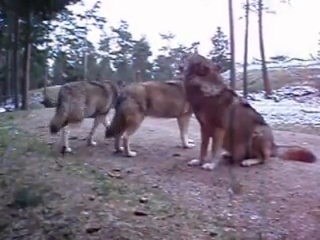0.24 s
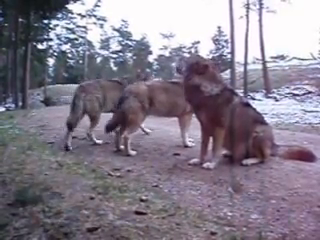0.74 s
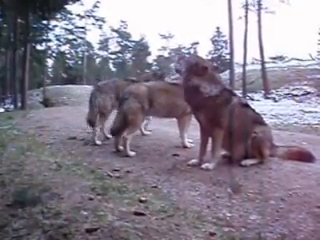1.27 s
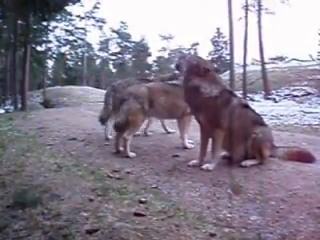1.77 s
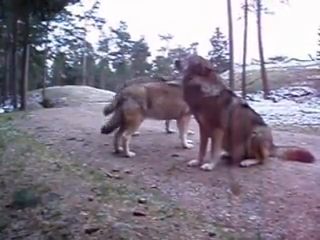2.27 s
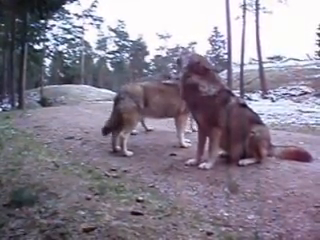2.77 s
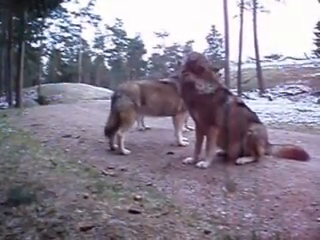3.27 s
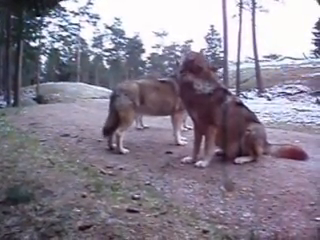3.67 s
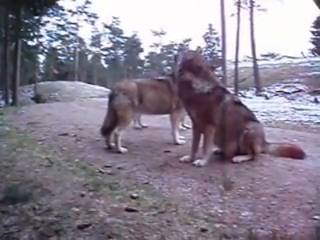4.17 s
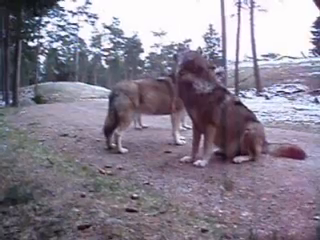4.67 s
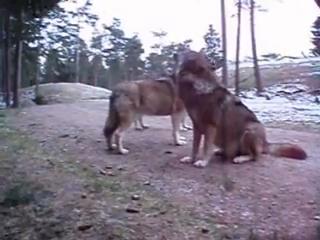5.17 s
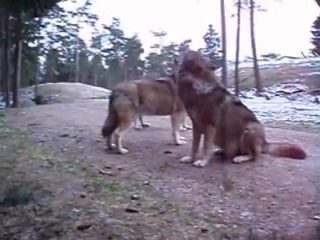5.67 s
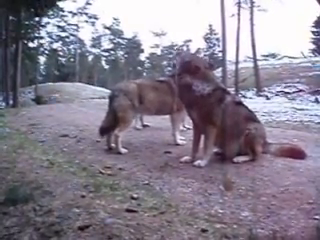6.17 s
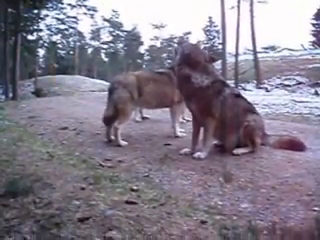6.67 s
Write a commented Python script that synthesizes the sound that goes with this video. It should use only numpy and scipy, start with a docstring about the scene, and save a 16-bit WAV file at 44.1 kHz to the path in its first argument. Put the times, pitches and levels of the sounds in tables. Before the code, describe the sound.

Four wolves howl together outdoors, near-pure voices gliding, yodelling and crossing in pitch, with light woodland echo, faint wind rumble and lo-fi camera sound.

```python
"""In a wooded enclosure, four wolves howl together: near-pure voices glide, yodel and cross.
Each voice is a stack of harmonics shaped by mouth and throat, with breath noise and rasping breaks.
Trees echo the voices through decaying noise, over wind rumble and camera hum.
A few faint clicks, short broadband pulses, are added to the sound.
The camera samples at 8 kHz and a spline joins the samples, which mirrors the voices faintly in the treble."""
import sys
import numpy as np
from scipy import signal
from scipy.fft import rfft, irfft
from scipy.io import wavfile
from scipy.ndimage import uniform_filter1d, minimum_filter1d

SR = 44100
rng = np.random.default_rng(int(sys.argv[2]) if len(sys.argv) > 2 else 0)


def generate_wav(signal):
    """Clip the signal to [-1, 1] and save it as 16-bit WAV at the path in sys.argv[1]."""
    frames = np.transpose(np.atleast_2d(signal))
    scaled = np.clip(frames, -1, 1) * 32767
    pcm = np.round(scaled).astype(np.int16)
    wavfile.write(sys.argv[1], SR, pcm)


N = 305613

# Colour of the wind rumble: [f/Hz, relative level/dB per Hz]
RUMBLE_COLOUR = [(20, -11), (40, -11.5), (70, -3.5), (100, -5.5), (150, -6), (220, -3.5), (400, -12),
                 (1000, -23.5), (4000, -48.5)]
# Tones of the camera hum: [f/Hz, peak level/dB against the rumble's rms]
HUM_TONES = [(30, -3), (60, -6), (88, -1.5), (120, -10)]
# Spells in which rumble and hum swell or sink: [start t/s, end t/s, level/dB against the calm]
GUSTS = [(0, .5, 5.5), (0.754, 1.49, 3.5), (1.903, 2.49, 5.5), (3.069, 3.48, 7), (3.5, 4.5, 2.5),
         (4.495, 4.95, -3.5), (5.048, 5.5, 0), (5.902, 6.93, 6.5)]
# Faint clicks, short broadband pulses: [t/s, peak level/dB before limiting and sampling]
CLICKS = [(3.977, -17), (3.993, -17), (4.486, -12), (4.492, -9)]
# Colour the throat gives the upper harmonics: [f/Hz, level/dB]
THROAT_COLOUR = [(800, -6.5), (1300, 8), (1700, 3), (2100, -5), (2400, -12), (2700, -21), (3100, -23),
                 (4000, -25)]
# Colour of the breath noise in the voices: [f/Hz, relative level/dB per Hz]
BREATH_COLOUR = [(250, -26), (500, -13), (1000, -13), (1600, -7), (2200, -10), (2800, -13), (4000, -9)]
# Voice breaks, where the folds vibrate chaotically:
# [middle t/s, half length/s, level/dB, tone f/Hz that sets the noise band]
VOICE_BREAKS = [(.48, 0.069, -31.5, 1200), (1.201, 0.061, -26, 1530), (1.288, 0.088, -20.5, 1440),
                (1.809, 0.089, -32.5, 1080), (1.963, 0.025, -26, 1410), (2.156, 0.044, -26, 1870),
                (2.317, 0.028, -24.5, 920), (2.479, 0.045, -29.5, 1230), (2.573, 0.022, -23.5, 1510),
                (3.966, 0.042, -32.5, 880), (6.481, 0.043, -33.5, 1190)]
# Second, slower vibration in the low wolf's throat: [t/s, beat f/Hz, depth 0-1]
GROWL_BEAT = [(2.05, 150, 0), (2.115, 147, .3), (2.165, 126, .95), (2.235, 113, 0)]
# Yodels, brief rounded leaps of pitch, listed by wolf: [top t/s, length/s, rise/semitones]
YODELS = { "low": [(.05, 0.094, 3.9), (.48, 0.18, 5.2), (.635, 0.2, 3.46), (.79, 0.055, 1.6),
          (2.02, 0.095, 1.28), (2.105, 0.085, 1.15), (2.3, 0.17, 1.2), (2.665, 0.14, 2.27),
          (2.795, 0.14, 1.44), (2.91, 0.17, 0.97), (3.36, 0.13, 1.03), (3.93, 0.071, 1.7),
          (4.205, 0.12, 3.3), (4.795, .12, 1.66), (5.048, 0.12, 2.68), (5.168, 0.14, 3.15),
          (5.28, 0.09, 2.4)], "middle": [(5.04, 0.099, 0.86), (5.41, 0.075, 1.21), (5.725, 0.062, 1.8)],
          "high": [(1.195, 0.072, 4), (1.465, .09, 1.355), (2.755, .11, 1.8), (6.125, 0.0591, 1.113)],
          "yelping": [(1.165, 0.065, 1.7)], }
# Path of each howl, listed by wolf:
# [t/s, pitch f/Hz, level/dB, mouth resonance/octaves above MOUTH_HZ]
HOWL_PATHS = { "low": [ [(0, 405, -20, 1.72), (.14, 412, -24, 0.57), (.24, 369.8, -29, 0.31),
              (.41, 340.2, -29, 0.82), (.49, 346.8, -15, 1.94), (.58, 352.8, -26, 1.66),
              (.74, 352.4, -23.5, 0.46), (.92, 352.6, -24, 0.47), (.94, 421, -23, 1.23),
              (1.04, 396.3, -19, 0.71), (1.21, 412.5, -22.5, 0), (1.245, 511, -23, 0.097),
              (1.257, 608, -10, .3), (1.288, 631, -8.5, .3), (1.296, 451, -24, 0), (1.38, 313, -31, 0)],
              [(1.75, 366.6, -25, 0.32), (1.8, 287.2, -30.5, 0.14), (1.84, 403.4, -22, 0.94),
              (1.885, 629, -24, 1.7), (1.92, 712.6, -27.5, 1.55), (1.95, 657, -18.5, 1.36),
              (1.965, 496, -21.5, 1.5), (2.1, 474, -13, 1.65), (2.16, 466, -21.5, 1.44),
              (2.26, 462.6, -21, 1.4), (2.37, 465.4, -23.5, 1.15), (2.43, 527.6, -27, 1.5),
              (2.45, 518, -22.5, 1.34), (2.47, 486, -18, 1.3)], [(2.455, 457.5, -21, 0.92),
              (2.49, 434.4, -24.5, 1.3), (2.53, 613.6, -22.5, 1.52), (2.555, 624.6, -17, 1.8),
              (2.565, 482.5, -23.5, 1.37), (2.6, 426.4, -21, 1.37), (2.74, 402, -19, 1.02),
              (3.215, 431.3, -16.5, 2), (3.272, 500, -11, 2.13), (3.297, 426.4, -20, 1.63),
              (3.44, 420.6, -26, 1.26), (3.61, 375, -26.5, 1), (3.71, 338.8, -33.5, 0.75),
              (4.14, 347.5, -35.5, 1.56), (4.275, 384, -28.5, 1.4), (4.34, 503.5, -30.5, 1.44),
              (4.4, 480.6, -25.5, 1.57), (4.43, 613.5, -24, 1.1), (4.47, 633, -22, 0.42)],
              [(4.49, 539.7, -13, 1.5), (4.52, 442.7, -19.5, 1.32), (4.57, 507.6, -18.5, 1.24),
              (4.66, 425.7, -25, 1.54), (4.94, 410, -24, 1.05), (5.0, 372, -25, 0.86),
              (5.1, 360.1, -24.5, 0.82), (5.24, 358.3, -20.5, 0.8), (5.39, 362.8, -22, 0.67),
              (5.56, 334.4, -22, 0.55), (5.585, 352, -24, 0.69), (5.6, 397, -22.5, 0.66),
              (5.66, 389.2, -24.5, 0.74), (5.695, 318.3, -24.5, 0.3)], [(5.68, 325, -26, 0.3),
              (5.84, 334.4, -29, 0.55), (6.15, 321.6, -34.5, 0.52), (6.23, 308, -29, 0.17)],
              [(6.215, 308.6, -26, 0.17), (6.26, 600, -19, 0.88), (6.285, 590, -30, 1.8),
              (6.31, 419.4, -23, 1), (6.35, 337.5, -26, 0.71), (6.445, 383, -14, 0.63)],
              [(6.425, 413.8, -28.5, 0.84), (6.54, 512, -14.5, 0.85), (6.61, 519.7, -10, 0.68),
              (6.62, 606.4, -9, 0.18), (6.69, 556.4, -7, 0.42), (6.7, 494, -12, 0.92),
              (6.76, 473.6, -15.5, 0.73), (6.85, 453.7, -19.5, 1.02), (6.93, 388.5, -16, 0.64)]],
              "middle": [ [(0, 554, 0, 0.49), (.1, 575, -16.5, 0.72), (.13, 529, -22.5, 1.36),
              (.23, 513, -22, 1.23), (.3, 644, -19, 1.22), (.37, 639.4, -10.5, 0.93),
              (.44, 547, -23.5, 1.1), (.51, 518, -18.5, 1.4), (.6, 434, -22.5, 0.8), (.75, 396, -17, 0.43),
              (.91, 444, -12.5, 0.82), (.94, 526, -22, 0.31), (1.01, 529, -14.5, 0.53),
              (1.02, 465, -17, 1.11), (1.15, 489, -19, 1.26), (1.2, 623, -15.5, 1.51),
              (1.33, 578, -18.5, 0.89), (1.37, 523, -22, 0.67), (1.56, 465, -17, 0.78),
              (1.74, 426, -22, 0.98), (1.9, 401, -15.5, 0.53)], [(1.89, 460, -16, -0.52),
              (2.03, 470, -10.5, -0.65), (2.17, 461, -23.5, -0.095), (2.33, 468, -11, -0.53),
              (2.4, 458, -13.5, -0.12), (2.47, 462, -16, 0.061), (2.59, 618, -30, 0.26),
              (2.74, 576, -23.5, 0.44), (2.85, 600, -21.5, 0.85), (3.06, 586, -22, 0.45),
              (3.16, 556, -18, 0.39), (3.29, 569, -45, 0.21)], [(3.3, 484, -15, 0.27),
              (3.36, 482, -25.5, 0.67), (3.51, 591, -22, 0.66), (3.63, 570, -11.5, 0.35),
              (3.73, 622, -12, 0.68), (3.75, 560, -17, 0.94), (3.93, 597, -13.5, 1.03),
              (3.97, 660, -11.5, 0.45), (4.11, 640, -10, 0.26), (4.16, 685, -11, 0.31),
              (4.28, 697, -5.5, 0.57), (4.35, 686, -14.5, 0.66), (4.4, 621, -15.5, 0.9),
              (4.45, 644, -16, 1.06), (4.55, 568, -10, 1.1), (4.74, 506, -18.5, 1.16),
              (4.82, 497, -17.5, 1.05), (4.88, 545, -19.5, 1.27), (4.95, 725, -11.5, 0.73),
              (5.09, 666, -12.5, 0.21), (5.16, 662, -11.5, 0.69), (5.25, 724, -13, 0.54),
              (5.36, 699, -11, 0.89), (5.54, 707, -15, 0.11), (5.68, 790, -15.5, 0.92), (5.75, 839, -24, 1),
              (5.81, 901, -20, 0.71), (5.89, 640, -21.5, 0.42), (5.96, 555, -38, 0.2)]],
              "high": [ [(0, 783.5, 10.5, 0.92), (.05, 829, -14.5, 1), (.15, 735, -12.5, 0.37),
              (.26, 744, -12, 1), (.45, 632.5, -10.5, 0.17)], [(.49, 617, -20.5, 1.17),
              (.64, 614, -20.5, 0.085), (.71, 680, -24, 1), (.8, 552, -20.5, 0.9)], [(1.16, 497.7, -28, 0),
              (1.25, 500, -15, 1.42), (1.31, 461, -19.5, 0.84), (1.36, 530.5, -20, 1.29),
              (1.52, 477, -21, 1.17), (1.65, 417.9, -20, 0.55), (1.71, 434.7, -28.5, 1.2),
              (1.82, 411.4, -18, 0)], [(2.48, 530, -29, .5), (2.6, 598.4, -18, 0.64),
              (2.71, 644.4, -17, 0.66), (2.82, 639, -14, 1.06), (2.86, 752, -19.5, 0.55),
              (2.91, 765, -10.5, 1), (2.96, 951, -16.5, 0.85), (3.11, 1017, -15, 0.86),
              (3.14, 1090, -29, 1.22), (3.24, 1240, -37, 1.37)], [(3.46, 1099, -15.5, 1.02),
              (3.56, 1005, -16, 0.89), (3.69, 793, -15, 0.65), (3.86, 698, -17, 0.44),
              (3.95, 640, -13.5, 0.15), (4.04, 535, -20, 0.12), (4.15, 504, -22, 0.14),
              (4.17, 620, -16, -0.37), (4.25, 511, -11.5, -0.14), (4.36, 495, -25, 0.076),
              (4.54, 479.3, -21, -0.13), (4.76, 490.4, -13.5, -0.49), (4.84, 437, -30, 0.1),
              (4.96, 429, -25.5, 0.18), (5.09, 441, -11.5, -0.76), (5.26, 494, -14.5, -0.23),
              (5.34, 718, -38, 1.5), (5.43, 731, -17, 1.15), (5.5, 607, -14, 0.57),
              (5.59, 525.7, -25, 1.08), (5.84, 464.5, -27, 1.05), (5.96, 512, -23, 1.05),
              (6.045, 601.5, -19.5, 1.13), (6.15, 631, -16, 0.86), (6.23, 603.3, -17.5, 1.16),
              (6.29, 643, -20, 1.6), (6.32, 561, -17.5, 1.1), (6.38, 510.4, -20.5, 1.04),
              (6.44, 494, -22.5, 0.66)]], "yelping": [ [(1, 684.5, -35, 0.44), (1.08, 754, -27, 0.49),
              (1.14, 663, -31.5, 1.1), (1.2, 644, -8, 1.1)], [(2.21, 586, -36, 0.19),
              (2.25, 684, -25, 0.28), (2.33, 621, -15.5, 0.19)], [(6.24, 604, -42.5, 0.17),
              (6.27, 618, -10, 0.31), (6.34, 625, -24.5, 0.33), (6.42, 711, -33.5, 0.44)],
              [(6.75, 630, -17, 0.32), (6.78, 695, -21, 0.38), (6.85, 678, -13, 0.31),
              (6.93, 664, -25, 0.27)]], }
# Voice of each howl, listed by wolf: [level of the fundamental that passes whatever the mouth does/dB,
# 2nd harmonic/dB, 3rd harmonic/dB, loss for each harmonic beyond the 3rd/dB, their lift at RING_HZ/dB]
HOWL_VOICES = { "low": [(-6, 0.47, -1.2, -0.9, -8), (-7, 0.064, 2.3, 0, -1), (-5, 0.99, -1.15, -0.5, 1.5),
               (-17.5, 1, -2.3, 0, 5), (-13, 0.75, 0.32, -0.24, 9.5), (-18, 0.57, -2.7, 1, 4),
               (-16, 0, 0.88, 0, 0)], "middle": [(-15, -2.2, -3.5, -1.17, -3), (-10.5, 1, -5.5, -4, 1),
               (-15, -0.38, -1.3, 1, 0.5)], "high": [(-19, 1.8, -5, -4.5, -7), (-19, 2.5, -4, 6, -3),
               (-22, -4, -0.5, 2.5, 5.5), (-18, -1.5, -1.5, -5.5, 1.5), (-28.5, -1.8, -0.5, 2, -1.8)],
               "yelping": [(-15, -2.5, -6, 4, 6), (-8, 6.5, 0, -7.5, -1), (-17, -6, -7, 5.5, 5),
               (-13, -18.5, 1, 12, 7)], }

CALM_DB, GUST_EDGE_S, BUFFET_DB = -54.5, .04, 2  # calm rumble; length of a spell's edges; quick wavering
TREES_T60_S, TREES_DB = .5, -19  # time for the echoes to fall 60 dB; their level
MOUTH_HZ = 500
MOUTH_OCTAVES, MOUTH_FALL_DB = .36, 18  # half width of the mouth resonance; steepness of its skirts
RING_HZ, RING_OCTAVES = 2250, .13  # second throat resonance, strong in some howls
WAVER, DRIFT = .002, .004  # quick and slower unsteadiness, as shares of the pitch
BREAK_JITTER = .012  # share of the pitch at the height of a break
FLUTTER_DB, SHIMMER_DB = 1.4, 1.18  # wavering of the fundamental; unevenness of the whole voice
HOARSE_DB = .55  # fast shimmer of a harmonic at 1 kHz, growing with the square of its frequency
LEAP_PER_S = 5  # pitch shares a second at which a glide becomes a leap
LEAP_DULL_DB = .5  # loss a harmonic at twice that speed
EDGE_S = .015  # fade at both ends of a howl
BREATH_DB, BREATH_FOLLOWS = -17, .9  # gain; power by which breath follows the pressed voice
CEILING = .72  # peak limit ahead of the sampling
CAMERA_HZ = 8000  # sampling rate
LIFT_HZ, LIFT = 10900, 1.9  # treble above this is added again with this gain
OFFSET, TOP_HZ = -.0028, 15600  # constant shift; final treble cut


def undb(db):
    """Turn decibels into an amplitude factor."""
    return 10 ** (np.asarray(db) / 20)


def shape_db(table, hz):
    """Read a (Hz, dB) table on a log-frequency axis."""
    f, db = np.transpose(table)
    return np.interp(np.log(np.maximum(hz, 1)), np.log(f), db)


def coloured(table, count):
    """Noise of rms 1 with the given spectrum."""
    hz = np.arange(count // 2 + 1) * SR / count
    spectrum = rfft(rng.standard_normal(count)) * undb(shape_db(table, hz))
    noise = irfft(spectrum, count)
    return noise / noise.std()


def walk(rate, count):
    """Random levels held 1 / rate seconds and smoothed twice; spread near 1."""
    hold = int(SR / rate)
    steps = np.repeat(rng.standard_normal(count // hold + 1), hold)
    return 1.4 * uniform_filter1d(uniform_filter1d(steps, hold), hold)[:count]


def rumble():
    """Wind on the microphone is low noise; the camera's unsteady hum rides the same level."""
    t = np.arange(N) / SR
    hum = np.zeros(N)
    for hz, db in HUM_TONES:
        level = undb(db + 2 * walk(16, N))
        hum += level * np.sin(2 * np.pi * (hz * t + .11 * walk(12, N)))
    gust_db = np.zeros(N)
    for start, end, db in GUSTS:
        gust_db += db * np.clip(np.minimum(t - start, end - t) / GUST_EDGE_S + .5, 0, 1)
    level = undb(CALM_DB + gust_db + BUFFET_DB * walk(15, N))
    return level * (coloured(RUMBLE_COLOUR, N) + hum)


def faint_clicks():
    """Each click is a single rounded pulse, 11 samples long, and so broadband."""
    s, db = np.transpose(CLICKS)
    pulses = np.bincount((s * SR).astype(int), undb(db), N)
    return np.convolve(pulses, np.hanning(11), "same")


def trees(voices):
    """Trunks scatter the voices into many echoes: a decaying noise tail."""
    t = np.arange(SR // 2) / SR
    tail = rng.standard_normal(len(t)) * undb(-60 * t / TREES_T60_S) * (t > .012)
    tail = tail / np.sqrt(np.sum(tail ** 2))
    return undb(TREES_DB) * signal.fftconvolve(voices, tail)[:N]


def breath(voices):
    """Air noise follows the pressed, harmonic-rich part of the voices."""
    highpass = signal.butter(4, 1350, "high", fs=SR, output="sos")
    pressed = signal.sosfilt(highpass, voices)
    effort = (uniform_filter1d(pressed ** 2, size=3000) + 1e-12) ** (BREATH_FOLLOWS / 2)
    return undb(BREATH_DB) * effort * coloured(BREATH_COLOUR, N) * undb(1.5 * walk(12, N))


def rasps():
    """Irregular pulses of the vocal folds ring a wide throat resonance for a moment."""
    out = np.zeros(N)
    for s, half_length, db, hz in VOICE_BREAKS:
        count = int(2 * max(half_length, .01) * SR)
        pulses = rng.standard_normal(count) * undb(1.2 * walk(150, count))
        band = [hz / 3.1, min(hz * 1.8, RING_HZ)]
        burst = signal.sosfilt(signal.butter(4, band, "band", fs=SR, output="sos"), pulses)
        start = int(s * SR) - count // 2
        out[start:start + count] += undb(db) * np.hanning(count) * burst / burst.std()
    return out


def growl(t):
    """A second, slower vibration in the throat makes the loudness throb."""
    s, beat_hz, depth = np.transpose(GROWL_BEAT)
    phase = 2 * np.pi * np.cumsum(np.interp(t, s, beat_hz)) / SR
    return 1 + np.interp(t, s, depth) * np.sin(phase)


def smooth_pitch(t, s, pitch_hz, yodels):
    """The pitch glides between the points of its path, with each yodel raising it briefly."""
    rise = np.zeros(len(t))
    for top, length, semitones in yodels:
        rise += semitones * np.cos(np.pi * np.clip((t - top) / length, -.5, .5)) ** 2
    glide = uniform_filter1d(np.interp(t, s, pitch_hz), size=450, mode="nearest")
    return glide * 2 ** (rise / 12)


def low_harmonics_db(hz, mouth_hz, voice_db):
    """The mouth resonance favours whichever of the first three harmonics lies near it."""
    levels = []
    for k in range(1, 4):
        octaves_off = np.log2(k * hz / mouth_hz)
        mouth_db = -MOUTH_FALL_DB * np.log10(1 + (octaves_off / MOUTH_OCTAVES) ** 2)
        if k == 1:
            own_db = 20 * np.log10(np.hypot(undb(mouth_db), undb(voice_db[0])))
        else:
            own_db = mouth_db + voice_db[k - 1]
        # the throat colours these harmonics only above RING_HZ
        throat_db = shape_db(THROAT_COLOUR, np.maximum(k * hz, RING_HZ)) - shape_db(THROAT_COLOUR, RING_HZ)
        levels.append(own_db + throat_db)
    return levels


def unsteady_phase(t, hz):
    """The pitch wavers and drifts; every break shakes it further."""
    count = len(t)
    rough = sum(np.clip(1 - np.abs(t - middle) / half, 0, 1) for middle, half, _, _ in VOICE_BREAKS)
    hz = hz * (1 + BREAK_JITTER * rough * walk(200, count))
    unsteady = 1 + WAVER * walk(60, count) + DRIFT * walk(15, count)
    return hz, 2 * np.pi * np.cumsum(hz * unsteady) / SR


def howl(rows, yodels, voice_db, growls):
    """One howl: a harmonic stack; the mouth picks among the low harmonics, the throat colours the rest."""
    s, pitch_hz, level_db, opening = np.transpose(rows)
    at = np.arange(int(max(s[0], 0) * SR), min(int(s[-1] * SR), N))
    t = at / SR
    count = len(t)
    hz = smooth_pitch(t, s, pitch_hz, yodels)
    # the folds slacken in fast leaps, so the upper harmonics fade
    leap = np.clip(np.abs(np.gradient(np.log(hz))) * SR / LEAP_PER_S - 1, 0, 3)
    mouth_hz = MOUTH_HZ * 2 ** np.interp(t, s, opening)
    low_db = np.interp(t, s, level_db) + np.array(low_harmonics_db(hz, mouth_hz, voice_db))
    hz, phase = unsteady_phase(t, hz)
    voice = np.zeros(count)
    for k in range(1, 12):
        if k <= 3:
            db = low_db[k - 1]
        else:
            throat_db = shape_db(THROAT_COLOUR, k * hz) - shape_db(THROAT_COLOUR, 3 * hz)
            ring = np.exp(-(np.log2(k * hz / RING_HZ) / RING_OCTAVES) ** 2)
            db = low_db[2] + throat_db - voice_db[3] * (k - 3) + voice_db[4] * ring
        db = db - LEAP_DULL_DB * leap * (k - 1)
        # high harmonics flutter more than low ones
        khz = np.minimum(k * hz, CAMERA_HZ / 2) / 1000
        db = db + HOARSE_DB * khz ** 2 * walk(150, count)
        db = db + FLUTTER_DB * np.sqrt(k) * walk(25.21, count)
        heard = k * hz < CAMERA_HZ / 2
        voice += heard * undb(db) * np.sin(k * phase + 2 * np.pi * rng.random())
    voice = voice * undb(SHIMMER_DB * walk(80, count))
    if growls:
        voice = voice * growl(t)
    edge = np.clip(np.minimum(t - s[0], s[-1] - t) / EDGE_S, 0, 1)
    # the root of 2 turns rms levels into sine peaks
    return np.bincount(at, np.sqrt(2) * voice * edge, N)


def pack():
    """All howls of the four wolves, with the rasps of the breaks and the breath noise."""
    voices = np.zeros(N)
    for wolf, paths in HOWL_PATHS.items():
        for rows, voice_db in zip(paths, HOWL_VOICES[wolf]):
            voices += howl(rows, YODELS[wolf], voice_db, growls=wolf == "low")
    voices = voices + rasps()
    return voices + breath(voices)


def scene():
    """Wolves, their echoes and the rumble with hum are summed; a few faint clicks are added to the sound."""
    wolves = pack()
    return (rumble() + faint_clicks() + trees(wolves) + wolves)[None]


def limit(x):
    """A smooth limiter turns the level down around peaks above the ceiling."""
    gain = minimum_filter1d(CEILING / np.maximum(np.abs(x), CEILING), size=800)
    return x * uniform_filter1d(gain, size=400)


def spline_playback(coarse):
    """A quadratic spline joins the coarse samples; its imperfect smoothing leaves faint mirror tones."""
    padded = np.pad(coarse, (1, 3), mode="edge")
    place = np.arange(N) * CAMERA_HZ / SR + .5
    i, u = place.astype(int), place % 1
    before = (1 - u) ** 2 / 2 * padded[i]
    middle = (.5 + u - u ** 2) * padded[i + 1]
    after = u ** 2 / 2 * padded[i + 2]
    return before + middle + after


def record(dry):
    """The sound is limited, sampled at 8 kHz, joined by a spline, lifted in the high treble and cut."""
    coarse = signal.resample_poly(limit(dry[0]), CAMERA_HZ, SR)
    curve = spline_playback(coarse)
    highpass = signal.butter(4, LIFT_HZ, "high", fs=SR, output="sos")
    lifted = curve + LIFT * signal.sosfiltfilt(highpass, curve)
    top_cut = signal.ellip(8, .2, 70, TOP_HZ, fs=SR, output="sos")
    return signal.sosfilt(top_cut, lifted + OFFSET)[None]


dry = scene()
out = record(dry)
generate_wav(out)
```